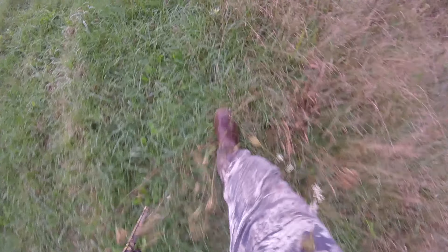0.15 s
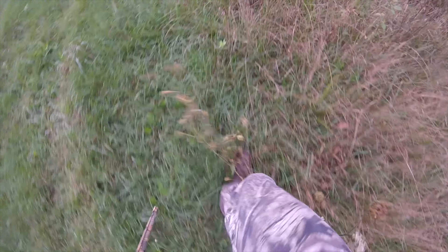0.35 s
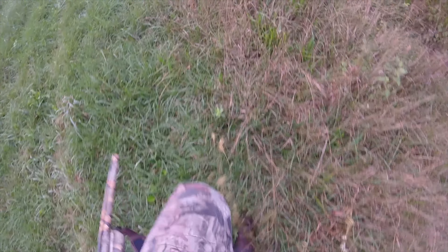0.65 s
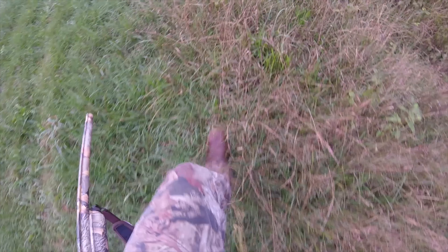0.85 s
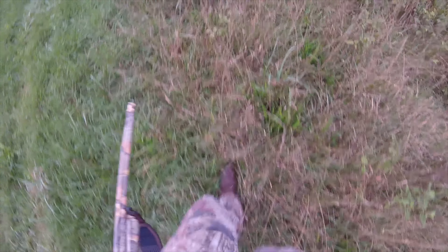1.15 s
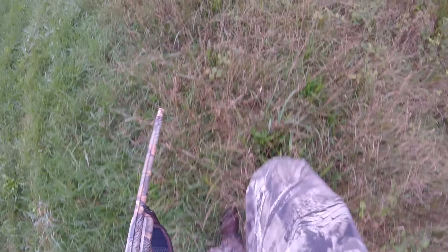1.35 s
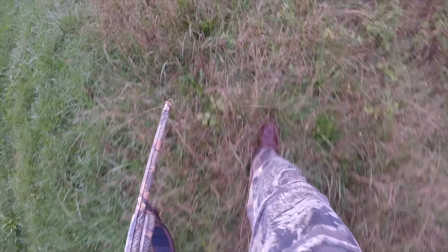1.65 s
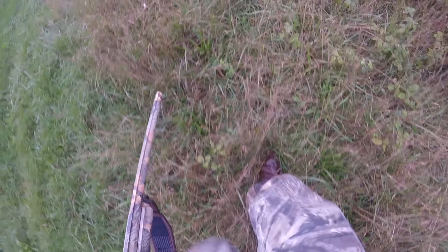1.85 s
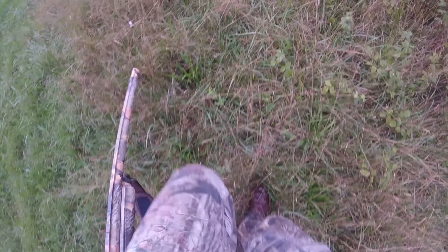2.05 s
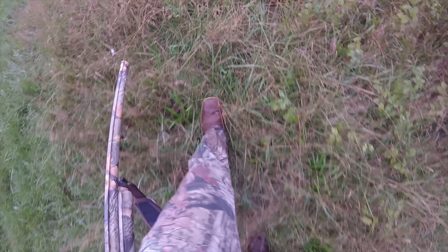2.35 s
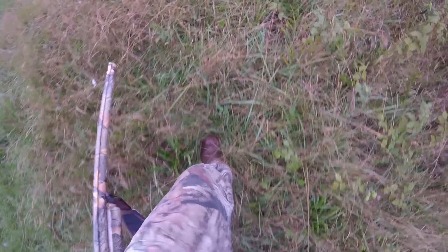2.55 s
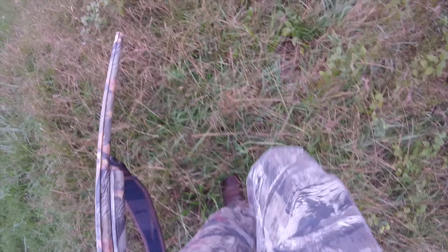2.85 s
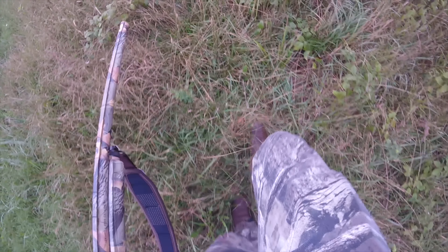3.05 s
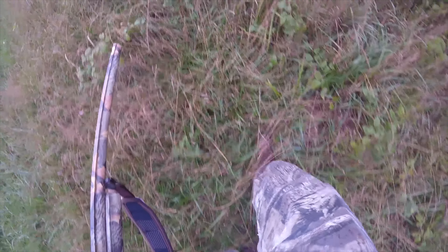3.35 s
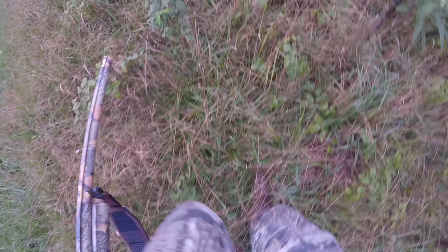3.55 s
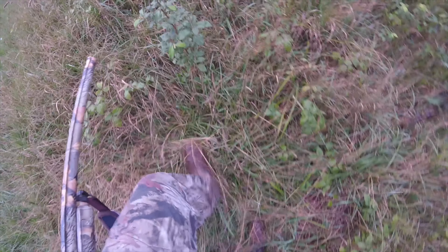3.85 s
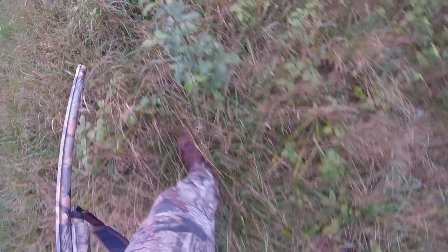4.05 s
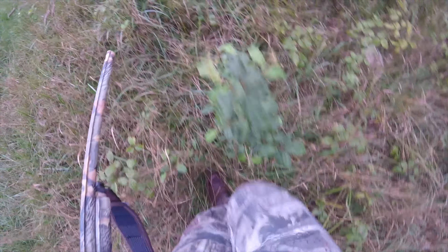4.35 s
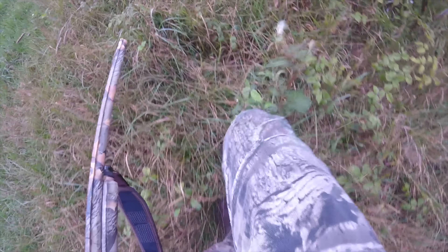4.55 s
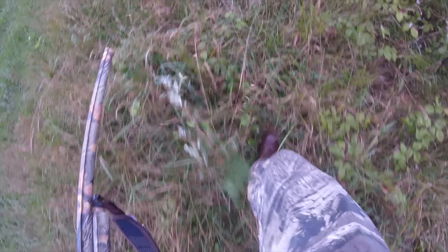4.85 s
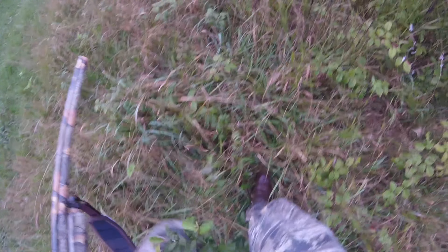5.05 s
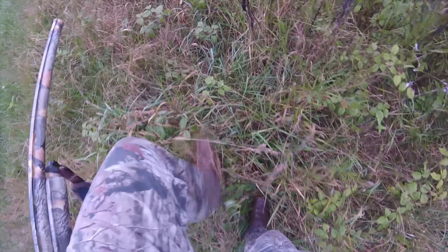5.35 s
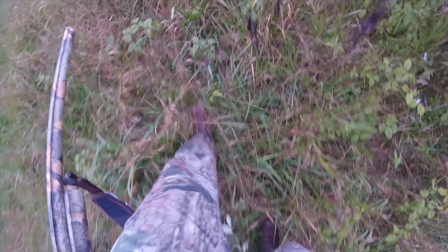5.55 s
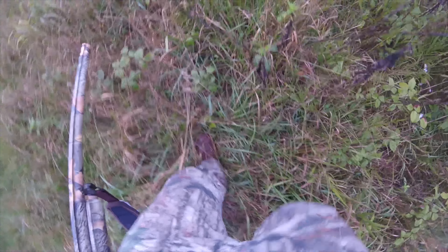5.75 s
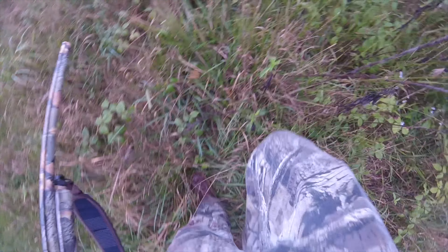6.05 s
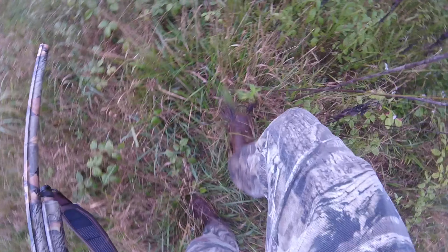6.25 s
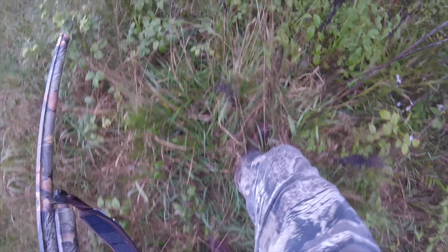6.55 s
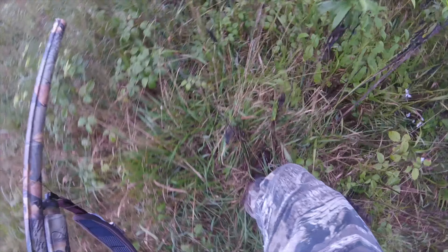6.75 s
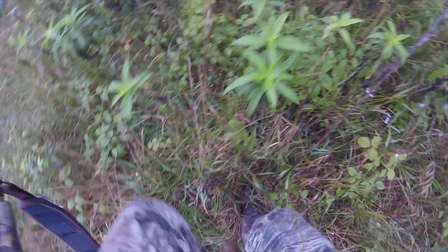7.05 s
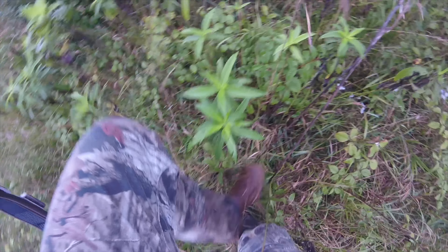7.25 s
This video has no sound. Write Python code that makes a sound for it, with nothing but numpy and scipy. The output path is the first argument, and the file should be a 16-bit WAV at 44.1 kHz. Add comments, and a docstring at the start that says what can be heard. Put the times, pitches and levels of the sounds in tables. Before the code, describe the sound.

From the start, low fluttering wind rumble and soft muffled rubbing surround a small closed camera housing worn by someone walking through tall grass. Straps and cloth scuff in strokes of roughly half a second, with dull small taps at 0.2, 0.8, 1.3 and 2.1 s, faint boot thuds around 2 to 3.3 s, and fine grass fizz swelling with each stride. Crickets give short, down-sliding chirps throughout; nearby insects trill in steady high pulses, over a blurred far chorus. A clearer tap comes at 4.2 s, then a cluster of clicks and brisker stem swish at 4.6-4.8 s. At 5.9 s a hard thumping knock hits, followed by rough rubbing and a hollow rattle at 6.2-6.35 s, as wind fades. A sharp click and stem snap land at 6.7 s, more scuffing follows, and a second heavy knock strikes at 7.23 s, trailing into a brief scrape.

```python
"""Low wind rumble and soft rubbing come first: a small camera in a closed housing, worn in tall grass.
Straps and stems rub and tap the housing, boots thud: clicks and struck tones ring its modes; two hard knocks thump.
Wind is lumpy filtered noise; the grass is a noisy fizz that swells with each stride.
Crickets chirp in short sliding tones, near insects trill in steady pulses, and far ones blur into bands.
A gain control pulls the level down after loud sounds, then lets it recover."""
import sys
import numpy as np
from scipy import signal
from scipy.fft import rfft, irfft
from scipy.io import wavfile

SR = 44100
rng = np.random.default_rng(int(sys.argv[2]) if len(sys.argv) > 2 else 0)


def unload_audio(sound):
    """Save the sound as a 16-bit wav file, at the path given as the first command line argument."""
    columns = np.transpose(np.atleast_2d(sound))
    # keep every value between -1 and 1, then stretch to whole-number steps
    steps = np.round(np.clip(columns, -1, 1) * 32767)
    wavfile.write(sys.argv[1], SR, steps.astype(np.int16))


N = 326340  # length in samples


def gain_of(db):
    """Turns dB into a linear gain."""
    return 10 ** (np.asarray(db) / 20)


def evened(x):
    """Scales a sound to rms 1."""
    return x / np.sqrt(np.mean(x ** 2) + 1e-20)


def columns(rows):
    """Draws each column after the first as a curve over time, one value a sample."""
    s, *values = np.transpose(rows)
    return [np.interp(np.arange(N) / SR, s, v) for v in values]


def add(mix, s, sound):
    """Mixes a sound in at s seconds, cut off at the end of the mix."""
    part = mix[round(s * SR):][:len(sound)]
    part += sound[:len(part)]


def colour(x, points):
    """Shapes the spectrum through (Hz, dB) points on a log frequency scale, then scales to rms 1."""
    hz, db = np.transpose(points)
    f = np.fft.rfftfreq(len(x), 1 / SR)
    curve_db = np.interp(np.log(f + 1), np.log(hz + 1), db)
    return evened(irfft(rfft(x) * gain_of(curve_db), len(x)))


def resonate(x, hz, width):
    """Passes a sound through one resonance of gain 1: a complex pole decaying at pi * width."""
    r = np.exp(-np.pi * width / SR)
    pole = r * np.exp(2j * np.pi * hz / SR)
    return 2 * signal.lfilter([1 - r], [1, -pole], x).real


def ring(x, modes):
    """Sums resonances side by side, each applied twice for steeper skirts."""
    return sum(gain_of(db) * resonate(resonate(x, hz, width), hz, width) for hz, width, db in modes)


def muffle(x, hz):
    """Dulls a sound with a fourth-order low-pass."""
    return signal.sosfilt(signal.butter(N=4, Wn=hz, fs=SR, output="sos"), x)


def wobble(per_s):
    """Slow random drift of rms 1: noise low-passed at per_s Hz, with its settling ends trimmed."""
    noise = rng.standard_normal(N + SR)
    low_pass = signal.butter(2, per_s, fs=SR, output="sos")
    return evened(signal.sosfiltfilt(low_pass, noise)[SR // 2:][:N])


def crackle(per_s, spread_db):
    """Random clicks of either sign and uneven size, averaging per_s a second; rms 1."""
    size_db = spread_db * np.minimum(rng.exponential(1, N), 4)
    size = gain_of(size_db) * rng.choice([-1., 1.], N)
    return evened(size * (rng.random(N) < per_s / SR))


# Middle modes of the housing. Each row: pitch in Hz, width in Hz (narrowed for a knock), level in dB.
MID_MODES = [(734, 383, 8.5), (851, 300, 12.5), (1085, 470, 0), (1283, 280, 3.5)]
# Low body of the housing, loose while walking. Each row: pitch in Hz, width in Hz, level in dB.
LOOSE_MODES = [(204, 270, -2.5), (360, 470, 2), (500, 260, -9)]
# Low body from the first knock on, nearly one mode. Each row: pitch in Hz, width in Hz, level in dB.
PRESSED_MODES = [(225, 105, 3), (362, 340, -9)]
# Colour of the finest rubbing. Each row: frequency in Hz, relative level in dB.
SCRATCH_COLOUR = [(900, -15), (1600, 0), (2200, -5.5), (2800, -3), (3250, 1), (3700, -9.5), (4500, -6),
                  (6000, -47)]
# Strokes of strap and cloth on the housing; the short rows strongest in the low body are boot thuds.
# Each row: start in seconds, length in seconds, first level in dB, last level in dB,
# low body in dB over that, scratch in dB over that.
STROKES = [(0.0, .38, -55, -51, 1, -17), (.42, .18, -60, -60, 5, -15), (.74, .38, -54, -55, -2, -17),
           (1.24, .1, -56, -54, 6, -17), (1.36, .44, -54, -51, -3, -15), (1.92, .56, -56, -57, 1, -19),
           (2.03, .04, -66, -63, 13, -20), (2.955, .06, -66, -65, 14, -20), (3.33, .03, -67, -65, 13, -20),
           (2.5, .09, -49, -50, -6, -21), (2.62, .26, -66, -64, 0, -10), (2.91, .48, -52, -55, 1, -20),
           (3.68, .88, -56, -54, -2, -17), (4.59, .1, -43, -43, -1, -14), (4.7, .11, -45, -46, -1, -13),
           (4.83, .22, -50, -54, -1, -17), (5.06, .32, -52, -50, -1, -17), (5.4, .38, -47, -53, -2, -18),
           (5.905, .1, -33, -37, -1, -8), (6.01, .11, -38, -41, 0, -14), (6.13, .07, -37, -40, -1, -17),
           (6.205, .07, -33, -32, -2, -15), (6.295, .2, -35, -45, -2, -17), (6.5, .21, -48, -45, -6, -20),
           (6.74, .44, -50, -60, -10, -17), (7.238, .17, -29, -43, -3, -15)]
GRIP_S, LET_GO_S = 0.008, 0.024  # every row rises quickly and lets go more slowly


def rubbing():
    """Dense uneven slips excite the housing modes, the finest the high ones; boot thuds lean on the low body."""
    slips = crackle(per_s=2000, spread_db=2.5) * gain_of(1.6 * wobble(per_s=49))
    fine_slips = crackle(per_s=2500, spread_db=3.0) * gain_of(1.8 * wobble(per_s=39))
    scratch = colour(fine_slips + 0.36 * slips, SCRATCH_COLOUR)
    mid = muffle(evened(ring(slips, MID_MODES)), hz=1410)
    loose, pressed = evened(ring(slips, LOOSE_MODES)), evened(ring(slips, PRESSED_MODES))
    out = np.zeros(N)
    first_knock_s = KNOCKS[0][0]
    for s, length, first_db, last_db, low_db, scratch_db in STROKES:
        at = slice(round(max(s, 0) * SR), min(round((s + length + LET_GO_S) * SR), N))
        t = np.arange(at.stop - at.start) / SR
        grip = np.clip(np.minimum(t / GRIP_S, (length + LET_GO_S - t) / LET_GO_S), 0, 1)
        low = loose if s < first_knock_s else pressed
        body = mid[at] + gain_of(low_db) * low[at] + gain_of(scratch_db) * scratch[at]
        slide_db = first_db + (last_db - first_db) * t / length
        out[at] += grip * gain_of(slide_db) * body
    return out


# Colour of a breaking stem. Each row: frequency in Hz, relative level in dB.
SNAP_COLOUR = [(1500, -10), (3000, 10), (7000, 13.5), (10000, 1), (14500, -8), (16500, -13)]


def crack(db, t60):
    """A bright noise burst, as of a breaking stem, that starts at once and decays 60 dB in t60 seconds."""
    t = np.arange(1300) / SR
    return gain_of(db - 60 * t / t60) * colour(rng.standard_normal(len(t)), SNAP_COLOUR)


# Single taps on the housing. Each row: start in seconds, level in dB before the soft onset,
# ring in Hz, 60 dB decay in seconds.
TAPS = [(0.21, -28, 480, 0.027), (0.764, -32, 573, 0.018), (1.335, -24, 670, 0.013),
        (2.062, -24, 826, 0.028), (2.168, -34, 760, 0.022), (3.029, -45, 720, 0.015),
        (3.349, -43, 470, 0.019), (3.7, -27.5, 800, 0.015), (4.192, -18.5, 777, 0.016),
        (4.596, -14, 734, 0.0067), (4.608, -22, 810, 0.019), (4.635, -24, 740, 0.024),
        (4.667, -17.5, 720, 0.016), (4.684, -22.5, 495, 0.032), (4.769, -28, 850, 0.016),
        (5.07, -19, 744, 0.014), (5.991, -6, 1020, 0.0061), (6.138, -22, 820, 0.014),
        (6.224, -8, 897, 0.03), (6.23, -12, 760, 0.074), (6.241, -21, 684, 0.026),
        (6.261, -17, 1010, 0.053), (6.272, -20.5, 1026, 0.04), (6.287, -11, 864, 0.037),
        (6.32, -26, 890, 0.024), (6.343, -18, 774, 0.022), (6.701, -27, 832, 0.044),
        (6.726, -8.5, 616, 0.0083), (7.082, -30.5, 920, 0.012), (7.322, -38, 790, 0.02)]
# Bright snaps, mostly dry stems breaking; the one at 4.5965 s is the high tick of the hard tap there. Each row:
# start in seconds, starting level in dB, 60 dB decay in seconds.
SNAPS = [(1.6875, -52, 0.012), (1.7474, -49, 0.012), (4.1832, -47.5, 0.015), (4.5965, -48, 0.008),
         (4.772, -43, 0.012), (6.725, -33, 0.016), (6.7685, -47, 0.012), (6.9997, -39.5, 0.011)]


def taps():
    """Dull taps ring the housing briefly as decaying sines; snapping stems and the tick of one hard tap are
    bright."""
    out, t = np.zeros(N), np.arange(2600) / SR
    onset = 1 - np.exp(-t / 0.00085)
    for s, db, hz, t60 in TAPS:
        add(out, s, -gain_of(db - 60 * t / t60) * onset * np.sin(2 * np.pi * hz * t))
    for s, db, t60 in SNAPS:
        add(out, s, crack(db, t60))
    return out


# High modes of the housing. Each row: pitch in Hz, width in Hz, level in dB before the knock picks its spot.
HIGH_MODES = [(1550, 600, -5), (2350, 600, -1), (2850, 500, -5), (3350, 600, 0), (4050, 600, -6)]
# Hard knocks. Each row: start in seconds, thump level in dB before its onset, thump in Hz,
# thump 60 dB decay in seconds, mid ring peak in dB, high ring peak in dB, high ring centre in Hz, crack in dB.
KNOCKS = [(5.8981, 2, 111, 0.03, -8, -16, 2760, -44), (7.2311, 3.5, 141, 0.02, -5.5, -20, 3100, -40.5)]
SPOT_WIDTH_HZ = 700  # a knock favours the high modes near its own pitch: 6 dB down this far away


def knocks():
    """The housing is pushed in and swings back as its modes ring and its parts chatter."""
    out, t = np.zeros(N), np.arange(6000) / SR
    blow = -t * np.exp(-t / .00008)
    mid = sum(gain_of(db) * resonate(blow, hz, 0.19 * width) for hz, width, db in MID_MODES)
    mid = muffle(mid, hz=1710)
    for s, thump_db, hz, t60, mid_db, high_db, spot_hz, crack_db in KNOCKS:
        # the parts chatter for a few ms
        rattle = rng.standard_normal(len(t)) * t * (np.exp(-t / 0.0012) + .03 * np.exp(-t / .006))
        spot_modes = [(f, w, db - 6 * ((f - spot_hz) / SPOT_WIDTH_HZ) ** 2) for f, w, db in HIGH_MODES]
        high = muffle(ring(rattle, spot_modes), hz=4320)
        push = (1 - np.exp(-(t / 0.000448) ** 2)) * np.sin(2 * np.pi * hz * t + 1.12)
        thump = -gain_of(thump_db - 60 * t / t60) * push
        mid_ring = gain_of(mid_db) * mid / abs(mid).max()
        high_ring = gain_of(high_db) * high / abs(high).max()
        add(out, s, thump + mid_ring + high_ring)
        add(out, s, crack(crack_db, t60=0.0099))
    return out


# Wind on the housing. Each row: time in seconds, rumble in dB, gust sharpness as upper bass in dB over the rumble.
WIND = [(0, -39.5, -19), (.17, -36, -6.5), (.22, -36.5, 2.5), (.32, -32.5, 0.5), (.4, -36.5, -15),
        (.55, -42, -8.5), (.75, -42, -6.5), (.9, -36.5, -13), (1.1, -35, -18), (1.2, -45.5, -9),
        (1.36, -49, -5), (1.5, -31.5, -14.5), (1.63, -34, -11), (1.75, -42, -10), (1.98, -44.5, -10),
        (2.4, -41.5, -10.5), (2.53, -36.5, -10), (2.66, -43, -20), (2.95, -45.5, -8), (3.16, -51, -5.5),
        (3.33, -40.5, -25), (3.57, -53.5, -4), (3.82, -39.5, -22), (4.05, -38.5, -9), (4.16, -41.5, -9),
        (4.32, -32, -8.5), (4.44, -35.5, -15), (4.53, -43, -21), (4.85, -40, -12), (5.08, -31.5, -21),
        (5.22, -45, -10), (5.5, -48, -18), (5.65, -38, -9), (5.84, -52, -12), (6.17, -52.5, 6.5),
        (6.27, -52, 12), (6.36, -50.5, 0), (7.4, -52.5, -2)]


def wind():
    """Lumpy pressure on the housing: deep noise for the rumble, upper bass for the sharp gusts."""
    rumble_db, sharp_db = columns(WIND)
    lumps = gain_of(1.6 * wobble(per_s=30))
    deep = colour(rng.standard_normal(N), [(6, 11), (20, 12.0), (40, 9), (65, -26), (120, -50.0)])
    upper = colour(rng.standard_normal(N), [(35, -3.5), (65, 7.5), (110, -0.5), (170, -10.0), (320, -53)])
    return gain_of(rumble_db) * lumps * (deep + gain_of(sharp_db) * upper)


# Colour of the grass stems. Each row: frequency in Hz, relative level in dB.
STEM_COLOUR = [(1500, -3.5), (3000, -0.5), (6000, 3), (8500, -4.5), (11000, -12.5), (13000, -20),
               (14300, -25)]
# Strides that drag a leg through the grass. Each row: fastest at in seconds, lasts in seconds,
# swell in dB, added to the stir.
STRIDES = [(.26, 0.22, -64), (.93, 0.2, -64), (1.64, 0.42, -65.5), (2.42, 0.28, -65.5), (3.17, 0.39, -67.5),
           (4.05, 0.68, -66.5), (4.734, 0.42, -60), (5.05, 0.24, -64.5), (5.53, 0.6, -61),
           (6.456, 0.76, -64), (7.26, 0.13, -64)]
STIR_DB = -77  # the grass between strides


def grass():
    """Fine fizz of stems flicking past: noise and clicks swelling with each stride."""
    fizz = 1.2 * rng.standard_normal(N) + 0.42 * crackle(per_s=2100, spread_db=-0.5)
    t = np.arange(N) / SR
    swells = sum(gain_of(db) * np.exp(-2 * ((t - s) / (lasts / 2)) ** 2) for s, lasts, db in STRIDES)
    drag = gain_of(STIR_DB) + swells
    return drag * gain_of(2.7 * wobble(per_s=25)) * colour(fizz, STEM_COLOUR)


# Cricket chirps, up to a few down-sliding pulses each. Each row: middle of the first pulse in seconds,
# number of pulses, level in dB, centre in Hz, the last two before the chance differences.
CHIRPS = [(-.045, 3, -56.5, 4600), (.075, 4, -58, 4070), (.344, 3, -55.5, 4460), (.422, 3, -56, 4700),
          (.726, 3, -56.5, 4050), (.81, 3, -55, 4450), (.924, 3, -60, 4700), (1.251, 3, -54.5, 4120),
          (1.404, 3, -58, 4700), (1.711, 3, -58, 4130), (1.848, 3, -58, 4400), (1.903, 3, -60, 4750),
          (2.32, 3, -61, 4130), (2.409, 3, -56.5, 4450), (2.872, 3, -58, 4600), (2.956, 3, -57, 4500),
          (3.365, 3, -53, 4550), (3.731, 4, -55, 4500), (3.983, 2, -58, 4450), (4.315, 4, -60, 4300),
          (4.43, 3, -53, 4700), (4.498, 2, -58, 4400), (4.523, 3, -54.5, 4120), (4.895, 2, -58, 4400),
          (5.022, 3, -63, 4040), (5.045, 3, -55, 4400), (5.118, 1, -55, 4300), (5.145, 2, -58, 4530),
          (5.368, 3, -61, 4520), (5.552, 3, -60, 4100), (5.708, 3, -51.5, 4500), (6.31, 3, -49, 4500),
          (6.888, 4, -55.5, 4520)]
FAR_CRICKETS, FAR_DB = 30, -66  # three-pulse chirps scattered at random, base level in dB
FIRST_GAP_S, GAP_S, FIRST_DB = .049, .056, -2  # the first pulse is softer and the next follows sooner
FALL_PER_S, SETTLE_HZ = 18.9, 3300  # the fall grows with the height above SETTLE_HZ
UNEVEN_DB, UNEVEN_HZ = 1.3, 30  # no two pulses are alike


def chirps():
    """Each wing stroke is a short clean tone that bends down; the weeds scatter a faint tail."""
    out, t = np.zeros(N), np.arange(-.015, .015, 1 / SR)
    bend = -FALL_PER_S * t - 400 * t ** 2
    fade = signal.windows.tukey(len(t), .8)
    far = rng.uniform([0, -3, 4000], [N / SR - .2, 2, 4800], (FAR_CRICKETS, 3))
    far_chirps = [(s, 3, FAR_DB + db, hz) for s, db, hz in far]
    for first_s, pulses, db, hz in list(CHIRPS) + far_chirps:
        for k in range(round(pulses)):
            wait_s = FIRST_GAP_S + GAP_S * (k - 1) if k else 0
            s = first_s + wait_s + t[0]
            off_db, off_hz, turn = rng.uniform(-1.02, 1, 3) * [UNEVEN_DB, UNEVEN_HZ, .5]
            pitch_hz = hz + off_hz + (hz - SETTLE_HZ) * bend
            pulse = gain_of(off_db) * np.sin(2 * np.pi * (np.cumsum(pitch_hz) / SR + turn))
            if s > t[0]:  # skip pulses centred before the start
                add(out, max(s, 0), gain_of(db + FIRST_DB * (k == 0)) * fade * pulse)
    lag = np.arange(5000) / SR
    scatter = gain_of(-60 * lag / 0.12) * (lag > .008) * rng.standard_normal(len(lag))
    tail = signal.oaconvolve(out, scatter / np.linalg.norm(scatter))[:N]
    return out + gain_of(-8) * tail


# Trilling insects. Each row: pitch in Hz, pitch swing either way through a pulse in Hz,
# sharpness of the pulses, roughness 0-1.
TRILLS = [(6780, 260, 3.0, .25), (7120, 180, 3.0, .3), (5350, 220, 2.5, .3), (7650, 200, 2.5, .5),
          (6480, 180, 2.5, .3)]
# Wing rhythm of each trill. Each row: pulses per second, starting phase in turns.
BEATS = [(13.47, .89), (23.695, -.02), (73.38, .68), (48.45, .1), (23.695, .75)]
# The walker passes the insects of each trill. Each row is one trill's list of passes:
# nearest at in seconds, level there in dB, distance in metres.
PASSES = [
    [(2.75, -57, .75)],
    [(2.1, -62.5, .7), (4.5, -65, .6), (5.5, -61, .7)],
    [(2.2, -64, .5), (6.2, -59, .5)],
    [(3.7, -72, 15)],
    [(0, -62, .8), (6, -61, 1.2)],
]
WALK_M_PER_S = 1.0
# Far insects. Each row: pitch in Hz, width in Hz, level at the start in dB, drift along the walk in dB per second.
CHORUS = [(4290, 300, -75.5, -0.4), (5455, 550, -63, 0), (6636, 520, -54, -0.98)]


def insects():
    """Near wings scrape in steady pulses of falling pitch; the far chorus blurs into flickering bands."""
    out, t = np.zeros(N), np.arange(N) / SR
    for (hz, swing_hz, sharp, rough), (per_s, turns), passes in zip(TRILLS, BEATS, PASSES):
        # power falls with the square of the distance
        power = sum(gain_of(2 * db) / (1 + (WALK_M_PER_S * (t - s) / m) ** 2) for s, db, m in passes)
        near = np.sqrt(power)
        cycle = 2 * np.pi * (per_s * t + turns)
        pitch_hz = hz - swing_hz * np.sin(cycle) + 60 * wobble(per_s=49.1)
        tone = np.sin(2 * np.pi * np.cumsum(pitch_hz) / SR)
        scrape = evened(ring(rng.standard_normal(N), [(hz, 2 * swing_hz, 0)]))
        strokes = np.exp(sharp * np.cos(cycle)) * gain_of(0.83 * wobble(per_s=4.1))
        out += near * evened(strokes * ((1 - rough) * tone + rough * scrape))
    for hz, width, db, drift_db in CHORUS:
        level_db = db + drift_db * t + 0.33 * wobble(per_s=90)
        out += gain_of(level_db) * evened(ring(rng.standard_normal(N), [(hz, width, 0)]))
    return out


# Colour of the field ambience. Each row: frequency in Hz, relative level in dB.
AIR_COLOUR = [(35, -38), (60, -2), (200, -9), (900, -12), (1600, -23), (3600, -28), (7300, -20.5),
              (8600, -42.5), (12500, -42), (13800, -77.5)]
AIR_DB = -53


def field_air():
    """Steady ambience of the open field: noise shaped to its colour."""
    return gain_of(AIR_DB) * colour(rng.standard_normal(N), AIR_COLOUR)


def scene():
    """The housing, wind, grass, insects and field air meet at one microphone."""
    housing = muffle(rubbing(), hz=4600) + taps() + knocks()
    outdoors = muffle(wind(), hz=512) + grass() + chirps() + muffle(insects(), hz=7550) + field_air()
    return (housing + outdoors)[None]


EDGE_HZ = 16300  # upper band limit


def record(dry):
    """Gain control dips after each loud knock and recovers; then a hard ceiling and a band limit."""
    power = signal.lfilter([1 / 300], [1, -299 / 300], dry[0] ** 2)  # averaged over about 300 samples
    power_db = 10 * np.log10(abs(power) + 1e-12)
    recovery_db = np.arange(N) * 29.0 / SR  # the held peak falls 29 dB per second
    held_db = np.maximum.accumulate(power_db + recovery_db) - recovery_db
    over_db = np.maximum(held_db + 17, 0)  # threshold -17 dB
    lagging_db = signal.lfilter([1 / 600], [1, -599 / 600], over_db)
    ducked = dry / gain_of(0.55 * lagging_db)
    clipped = np.clip(ducked, -.99, .99)
    band_limit = signal.firwin(511, EDGE_HZ, window=("kaiser", 9), fs=SR)
    return signal.oaconvolve(clipped, band_limit[None], "same")


dry = scene()
out = record(dry)
unload_audio(out)
```